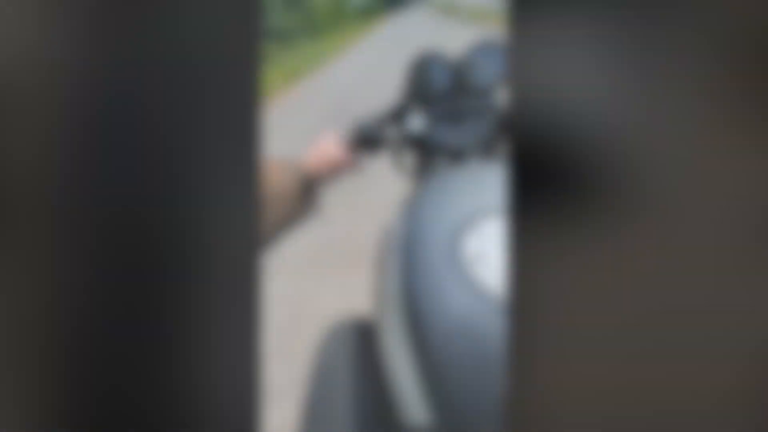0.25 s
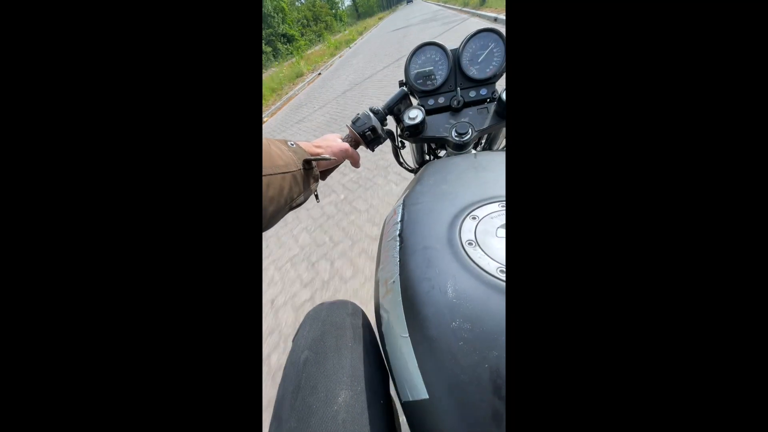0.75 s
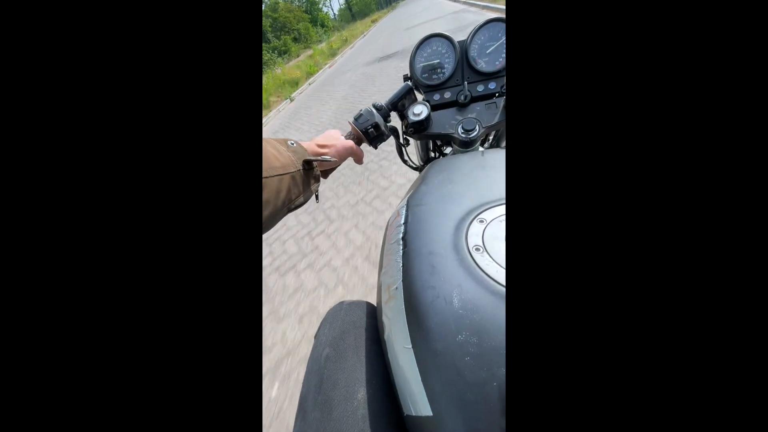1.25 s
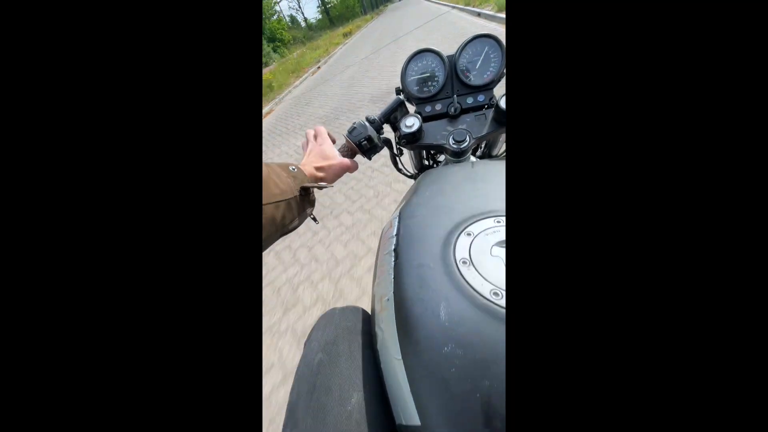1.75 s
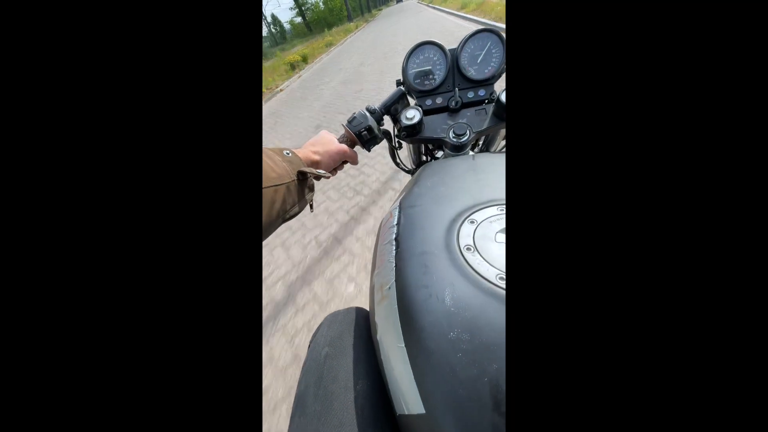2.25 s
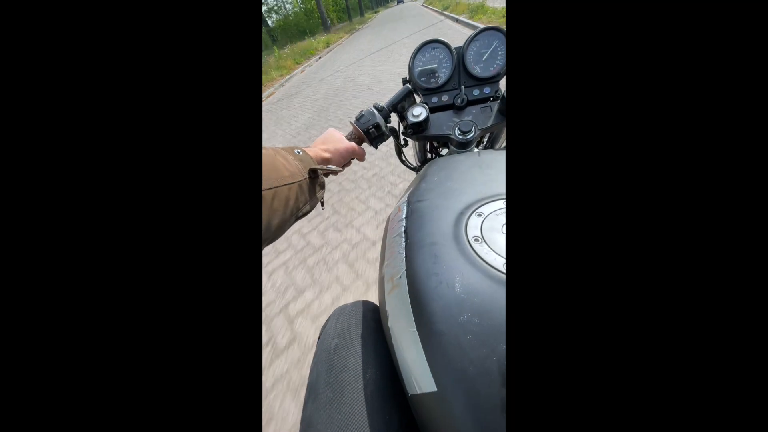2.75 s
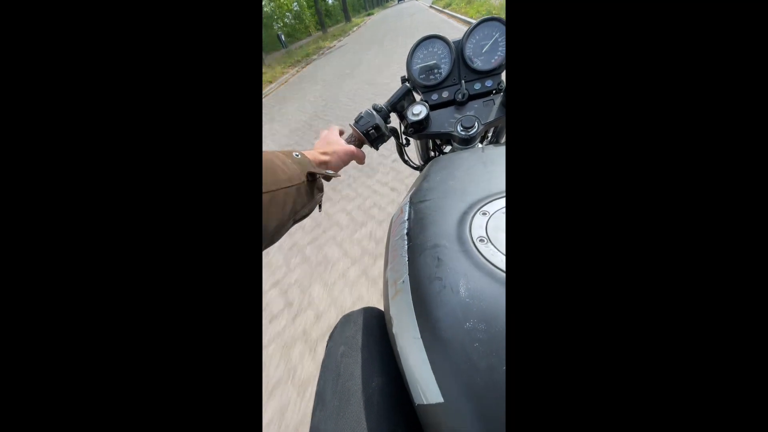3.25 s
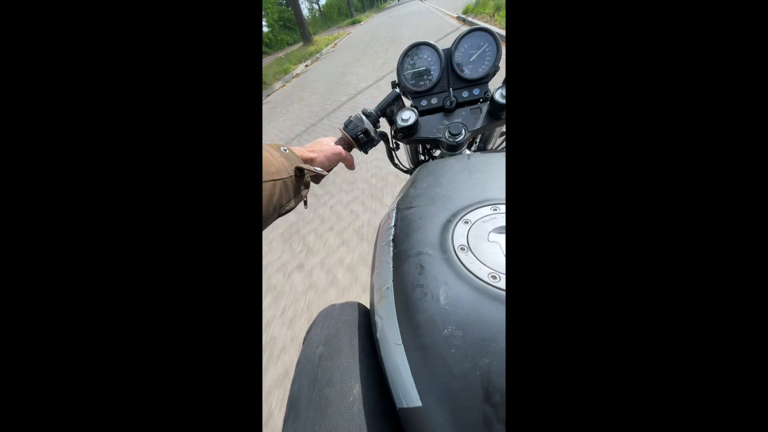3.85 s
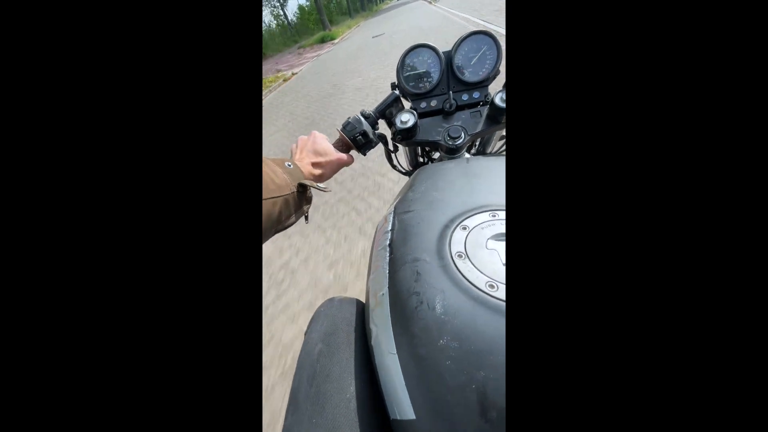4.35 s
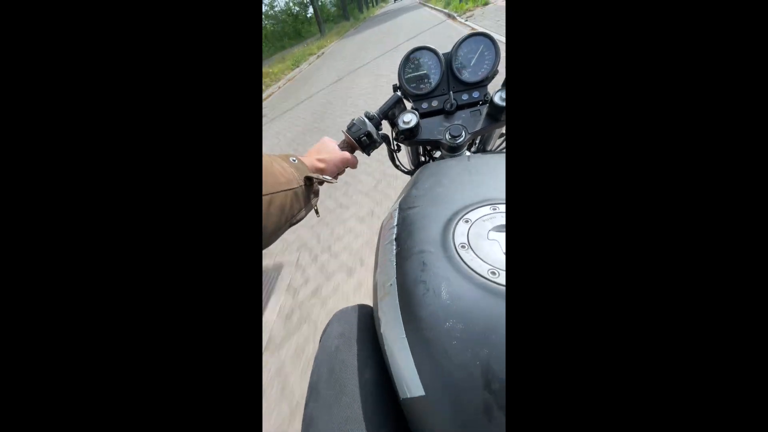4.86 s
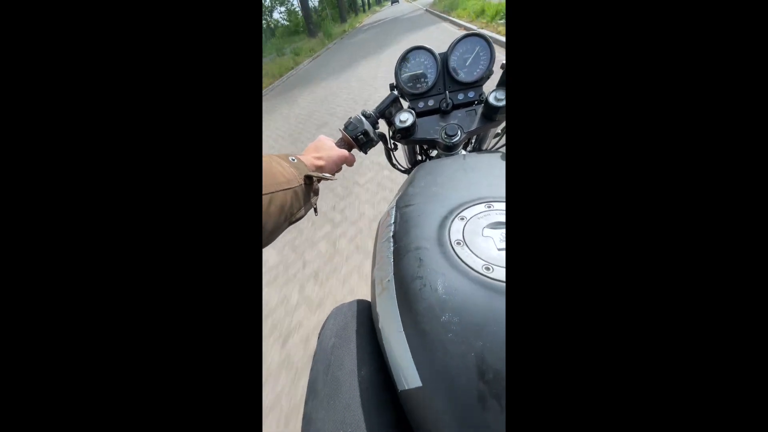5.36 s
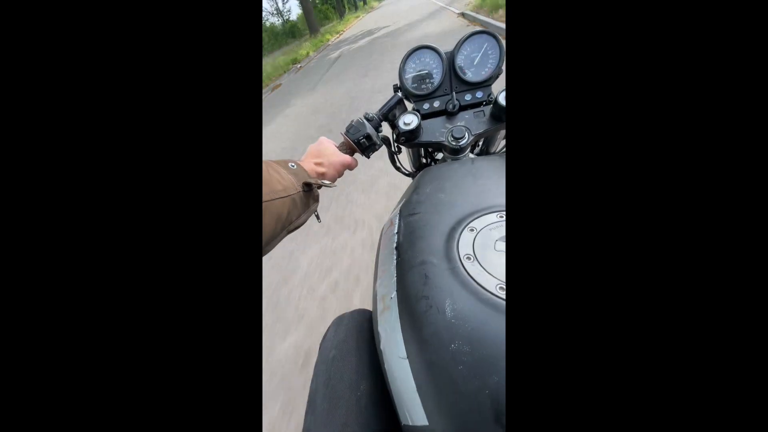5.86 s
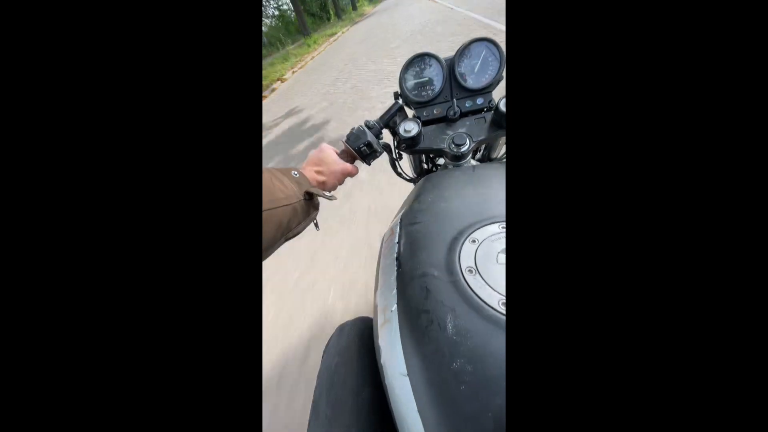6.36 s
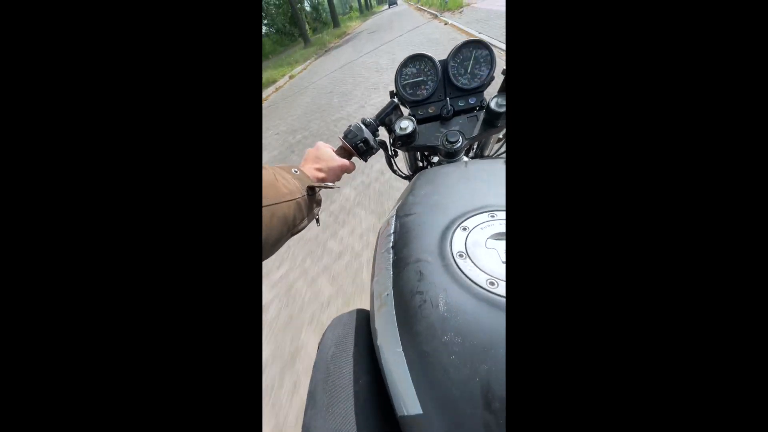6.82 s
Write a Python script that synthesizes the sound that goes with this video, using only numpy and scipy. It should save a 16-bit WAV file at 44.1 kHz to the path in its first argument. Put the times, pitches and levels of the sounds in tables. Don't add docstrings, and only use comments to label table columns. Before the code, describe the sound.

A four-cylinder motorcycle rides on block paving, heard dry and close above the tank, in buffeting wind. At 0 s the clutch bites with a low shudder, bright sizzle and quick metallic ticking. From about 0.4 s a deep intake boom swells, pitch rising steadily from roughly 226 to 274 Hz until 1.2 s, with rasp, hiss, gear whine and rattling. The throttle snaps shut; pitch falls, with knocks, soft thumps and a tiny squeak near 1.7 s. Second gear builds from 1.9 s, strongest near 3.3 s, climbing until 4.05 s. Another shift brings falling pitch, a brief blip at 4.5 s, clutch sizzle and a heavy thump at 4.8 s. A shorter, stuttering third-gear pull ends at 5.4 s with a hard knock. Coasting follows to 7.1 s: pitch sinking below 200 Hz, thin chain hiss, gusts, dull taps and frequent paving knocks.

```python
import sys
import numpy as np
from scipy import signal
from scipy.io import wavfile
from scipy.ndimage import uniform_filter1d, minimum_filter1d

SR = 44100
rng = np.random.default_rng(int(sys.argv[2]) if len(sys.argv) > 2 else 0)


def to_linear_factor(level_db):
    exponent = np.asarray(level_db, float) / 20
    return 10 ** exponent


def dump_mix(stems):
    frames = np.atleast_2d(stems).T
    limited = np.clip(frames, -1, 1)
    pcm = np.round(limited * 32767).astype(np.int16)
    wavfile.write(sys.argv[1], SR, pcm)


N = 312669


def rms_one(x):
    return x / np.sqrt(np.mean(x ** 2) + 1e-20)


def in_time(rows):
    s, *columns = np.transpose(rows)
    return [np.interp(np.arange(N) / SR, s, c) for c in columns]


def bump(s, half_s):
    return np.exp(-((np.arange(N) / SR - s) / half_s) ** 2)


def drift(rate):
    r = np.exp(-80 * np.pi * rate / SR)
    slow = signal.lfilter([1], [1, -2 * r, r * r], rng.standard_normal(N // 40 + 2002))[2000:]
    return np.interp(np.arange(N) / 40, np.arange(len(slow)), rms_one(slow))


def ring(clicks, hz, t60):
    r = to_linear_factor(-60 / (t60 * SR))
    w = 2 * np.pi * hz / SR
    return signal.lfilter([0, np.sin(w)], [1, -2 * r * np.cos(w), r * r], clicks + 1e-18)


def banded_noise(spectrum, gusts_db, own_db):
    hz, level = np.transpose(spectrum)
    edges = hz[0] * 2 ** np.arange(0, np.log2(hz[-1] / hz[0]) + .1, 1 / 3)
    white = rng.standard_normal((2, N))
    out = 0
    for k, (low, high) in enumerate(zip(edges, edges[1:])):
        band_filter = signal.butter(2, [low, high], "band", fs=SR, output="sos")
        band = signal.sosfilt(band_filter, white[k % 2])
        band_db = np.interp(np.log(low * high) / 2, np.log(hz), level)
        out = out + band * to_linear_factor(band_db + own_db * drift(14))
    return rms_one(out * to_linear_factor(gusts_db))


def order(cycles, k, level_db, waver_db):
    spread = .04 * k ** 2 + np.pi * k * (k > 20) + .6 * rng.uniform(-1, 1)
    wobble = .008 * k * drift(8) + .02 * k * drift(.8)
    level = np.sqrt(2) * to_linear_factor(level_db + waver_db * drift(6.1))
    return level * np.sin(2 * np.pi * k * cycles + spread + wobble)


# time in seconds, gain in dB, half length in seconds.
GUSTS = [(0.4, 4.5, 0.023), (0.51, 4, 0.58), (0.8, 2, 0.015), (0.854, 10, 0.0074), (0.973, -4, 0.037),
         (1.175, 8, 0.019), (1.284, -4.3, 0.011), (1.35, 4.7, 0.036), (1.462, -3.5, 0.23),
         (1.45, 0.5, 0.057), (1.565, 5, 0.03), (1.663, -7, 0.015), (1.793, -2, 0.039), (1.985, 5, 0.023),
         (2.17, -9, 0.03), (2.503, 7.5, 0.0078), (2.663, -5, 0.011), (2.855, 3, 0.014), (2.922, 8, 0.46),
         (2.927, -6, 0.032), (3.227, 6, 0.023), (3.337, 4, 0.04), (3.435, 8, 0.025), (3.518, 8.5, 0.015),
         (3.564, 14, 0.018), (3.67, -3, 0.048), (3.842, 4, 0.029), (4.033, -8, 0.037), (4.118, 1, 0.037),
         (4.247, 3.5, 0.038), (4.29, -4.5, 0.2), (4.332, -1, 0.025), (4.64, 2, 0.015), (4.813, 7.5, 0.057),
         (5.107, 8, 0.016), (5.257, 0, 0.04), (5.333, -3, 0.025), (5.403, 5.5, 0.024), (5.496, 2.5, 0.0083),
         (5.65, -4, 0.071), (5.84, 5, 0.026), (5.94, -3, 0.013), (6.206, -2, 0.017), (6.372, -5, 0.011),
         (6.387, 12, 0.015), (6.428, 5, 0.015), (6.465, -4.5, 0.25), (6.563, -2, 0.019), (6.722, -2, 0.015),
         (6.881, -9.5, 0.013), (7.017, -2.5, 0.013)]


def gusts():
    return sum(db * bump(s, half_s) for s, db, half_s in GUSTS)


# frequency in Hz, level in dB per Hz.
THUMP_SPECTRUM = [(30, -27.5), (50, -11.5), (72, 0.5), (110, 1), (180, -3.5), (280, -4.5), (360, -11)]
# frequency in Hz, level in dB per Hz.
FLUTTER_SPECTRUM = [(200, -1.5), (330, 0.5), (500, 4), (800, -4.5), (1200, -9.5), (2000, -24),
                    (3500, -24.5)]


def wind(thump_db, flutter_db):
    eddies = drift(42)
    eddies = rms_one(eddies - uniform_filter1d(eddies, size=1800))
    eddies = 1.6 * np.tanh(eddies / 1.4)
    thump = to_linear_factor(thump_db + 1.5) * banded_noise(THUMP_SPECTRUM, 1.4 * eddies, own_db=1.0)
    flutter = banded_noise(FLUTTER_SPECTRUM, 2.73 * eddies, own_db=3.0)
    burst = rng.random(N) < 120 / SR
    size = to_linear_factor(2.9 * np.minimum(rng.exponential(1, N), 3))
    pops = burst * size * rng.choice([-1, 1], N)
    pops = signal.sosfilt(signal.butter(2, 2500, fs=SR, output="sos"), pops)
    pops = ring(pops, 600, .005) + to_linear_factor(-7) * ring(pops, 1700, .004) + to_linear_factor(-13) * ring(pops, 3200, .003)
    flutter = to_linear_factor(flutter_db - 3.5) * (flutter + to_linear_factor(-11.5) * rms_one(pops))
    low_cut = signal.butter(3, 38, "high", fs=SR, output="sos")
    return signal.sosfilt(low_cut, thump + flutter)


# time in seconds, sharp part in dB, dull part in dB,
# half length in ms.
DEEP_JOINTS = [(0.0717, -36, -38, 3), (0.715, -29, -35, 10), (0.7537, -28, -44, 7.5),
               (0.769, -21.5, -24, 3.9), (0.8524, -27, -18, 0.56), (0.9618, -29.5, -43, 3.5),
               (1.0378, -32.5, -33, 14), (1.3773, -41, -17.5, 4.4), (1.5918, -33.5, -32, 3.8),
               (2.8316, -28.5, -21.5, 0.9), (2.8811, -27, -25, 1.1), (2.9729, -28, -25, 0.61),
               (3.5196, -24.5, -37.5, 1.15), (3.7421, -24, -33.5, 1.1), (3.8483, -27.5, -31.5, 1.3),
               (3.9045, -34, -31, 0.53), (4.4084, -38, -19, 1.1), (4.4953, -41, -20, 4.6),
               (4.6307, -32.5, -33, 5), (4.7448, -30.5, -17, 2.3), (4.789, -30.5, -32, 0.92),
               (4.8412, -32.5, -39.5, 7.5), (5.4928, -32, -21, 3), (5.7291, -29, -12.5, 2.5),
               (5.8215, -36, -13, 1.2), (5.9104, -33.5, -13, 0.86), (5.9514, -45, -17, 0.45),
               (6.1331, -41, -17, 0.73), (6.3877, -53, -30, 2.2), (6.8136, -62, -21, 4)]
# time in seconds, peak in dB, sharp part in dB against the peak.
SHALLOW_JOINTS = [(0.8, -20.5, -14), (0.838, -21.5, -11), (1.206, -23, -15), (1.427, -34, 3),
                  (1.879, -25.5, -14), (4.019, -27.5, -19), (4.071, -26.5, -7.5), (4.373, -41, -16),
                  (4.452, -32, -16), (4.826, -20.5, -14), (4.878, -23, -10), (4.963, -25, -17),
                  (5.011, -19, -5.5), (5.69, -31, -6), (5.788, -33, -11), (5.859, -30, -22),
                  (5.97, -31, -2), (6.026, -19, -17), (6.098, -36, -17), (6.165, -24, -6),
                  (6.254, -19.5, -32.5), (6.293, -25, -13), (6.434, -15.5, -26), (6.479, -37, -17),
                  (6.508, -25, -20), (6.59, -27, -20), (6.647, -29, -22), (6.676, -31, -23),
                  (6.79, -41, -22), (6.837, -22, -21), (6.892, -45, -16), (6.906, -24, -20),
                  (6.969, -19, -21), (7.042, -33, -23)]
# time in seconds, peak in dB, sharp part in dB against the peak.
DRIVE_KNOCKS = [(0.687, -27, -10), (0.729, -14, -22), (0.883, -26, -5), (0.929, -25, -11),
                (1.014, -25, -13), (1.088, -24.5, -13), (1.187, -21, -19.5), (1.254, -22.5, -16),
                (1.399, -21, -23), (1.465, -28, -7.5), (1.524, -40, -18), (1.571, -24, -13),
                (1.61, -29, -6), (1.723, -28, -7), (1.847, -24.5, -8.5), (4.107, -23.5, -16),
                (4.122, -22.5, -15), (4.177, -28, -10), (4.226, -29.5, -10), (4.282, -31, -10),
                (4.344, -44, -19), (4.467, -28, -19), (4.515, -19.5, -23), (4.547, -19, -23),
                (5.283, -9.5, -32), (5.409, -22, -19), (5.443, -35, -20), (5.543, -26, -18)]


def joints():
    shallow = [(s + .002, db + sharp_db - 8, db + 3, 2.2) for s, db, sharp_db in SHALLOW_JOINTS]
    knocks = [(s, db + sharp_db, db + 1.5, 1.84) for s, db, sharp_db in DRIVE_KNOCKS]
    return DEEP_JOINTS + shallow + knocks


# time in seconds, level in dB, half length in seconds.
RATTLES = [(0.697, -31, .02), (.745, -33, 0.05), (0.84, -31.5, 0.012), (0.893, -38, 0.013),
           (0.93, -35.5, 0.025), (0.965, -32.5, 0.0086), (1.049, -34.5, 0.035), (1.094, -38, 0.0088),
           (1.385, -39.5, 0.023), (2.84, -40, 0.011), (3.57, -43, 0.016), (3.867, -40, 0.026),
           (4.11, -44, 0.026), (5.416, -44.5, 0.0095), (5.86, -53, 0.01), (5.96, -42.5, 0.013),
           (6.226, -44, 0.023), (6.39, -48, 0.011), (6.426, -45, 0.014), (6.808, -43, 0.013),
           (6.844, -54, 0.0065), (6.915, -51, 0.012), (6.967, -49, 0.0063), (7.052, -46, 0.0093)]
# frequency in Hz, level in dB, 60 dB decay in seconds.
FRAME_MODES = [(507, 1.5, 0.0084), (1310, 7.5, 0.0034), (1630, 2.5, 0.0044), (2230, 0, .004),
               (3230, -5.5, 0.0031), (4400, -13.5, 0.0022), (6500, -17.5, 0.0028), (9000, -21, .002)]


def jolts():
    rattles_per_s = 900
    thud_hz, thud_db, thud_t60_s, thud_late_s = 190, -32, 0.025, 0.0036
    lag_ms = np.arange(-400, 400) * 1000 / SR
    rows = joints()
    ragged = rng.standard_normal((len(rows), 2, len(lag_ms)))
    shakes = np.zeros((2, N))
    for (s, sharp_db, dull_db, half_ms), noise in zip(rows, ragged):
        shape = np.exp(-(lag_ms / half_ms) ** 2)
        energy = np.sum((noise * shape) ** 2, axis=1, keepdims=True)
        knock = noise * shape * np.sqrt(np.sum(shape ** 2) / energy)
        level = to_linear_factor(np.array([[sharp_db], [dull_db]])) / np.sqrt(np.clip(half_ms, .3, 2))
        at = round(s * SR) - 420
        shakes[:, at:at + len(lag_ms)] += knock * level
    grains = (rng.random(N) < rattles_per_s / SR) * rng.standard_normal(N)
    shakes[0] += grains * sum(to_linear_factor(db + 13.5) * bump(s, half_s) for s, db, half_s in RATTLES)
    (dull_hz, dull_db, dull_t60), *modes = FRAME_MODES
    sharp = sum(to_linear_factor(db - 18) * ring(shakes[0], hz, t60) for hz, db, t60 in modes)
    sharp = signal.sosfilt(signal.butter(2, 6000, fs=SR, output="sos"), sharp)
    dull = to_linear_factor(dull_db - 20.5) * ring(shakes[1], dull_hz, dull_t60)
    late = np.roll(shakes[1], int(thud_late_s * SR))
    return sharp + dull + to_linear_factor(thud_db) * ring(late, thud_hz, thud_t60_s)


# time in seconds, peak in dB.
SNAPS = [(1.591, -43), (2.972, -45), (3.5174, -47), (3.7412, -45), (3.8512, -44.5), (4.786, -48),
         (4.8406, -54), (5.4926, -39), (5.728, -54), (5.82, -48), (5.908, -46)]
# time in seconds, peak in dB.
TAPS = [(1.524, -34), (4.345, -34), (4.399, -42), (4.467, -30), (4.492, -30.5), (4.629, -28), (5.442, -29),
        (6.506, -32.5), (6.59, -34), (6.791, -31), (7.044, -29)]
TAP_HZ = (620, 1150, 1900)


def snaps():
    snap_half_s, tap_t60_s = .0006, .022
    crack = rng.standard_normal(N) * sum(to_linear_factor(db - .5) * bump(s + .001, snap_half_s) for s, db in SNAPS)
    band = signal.butter(1, [2800, 9500], "band", fs=SR, output="sos")
    clicks = np.zeros(N)
    for s, db in TAPS:
        clicks[int(s * SR)] = to_linear_factor(db - 3.5)
    taps = sum(800 / hz * ring(clicks, hz, tap_t60_s * 800 / hz) for hz in TAP_HZ)
    return 2 * signal.sosfilt(band, crack) + taps


# start in seconds, end in seconds, ticks per second, level in dB,
# fading in dB per second, high modes in dB.
CHATTER = [(.002, .095, 71.5, -39, 10, 3), (.098, .14, 71.5, -50, 0, -2), (.15, .19, 73, -41, 120, 3),
           (.192, .3, 71.5, -48, 40, -2), (.326, .345, 140, -50, 0, 0), (1.505, 1.56, 190, -56, 0, -12),
           (4.365, 4.4, 215, -62, 0, -12), (6.59, 6.685, 200, -59, 0, -9), (6.705, 6.75, 200, -59, 0, -9)]


def chatter():
    low, high = np.zeros(N), np.zeros(N)
    for start, end, per_s, level_db, fading_db, high_db in CHATTER:
        s = np.arange(start + .004, end, 1 / per_s)
        late, size = np.clip(rng.standard_normal((2, 99))[:, :len(s)], -1.5, 1.5)
        at = ((s + 0.017 * late / per_s) * SR).astype(int)
        low[at] = to_linear_factor(level_db - fading_db * (s - start) + 2.0 * size)
        high[at] = low[at] * to_linear_factor(high_db)
    ticks = sum(ring(low, hz, 0.0057) for hz in (7600, 8500, 9500))
    ticks += sum(ring(high, hz, .003) for hz in (12500, 13700, 11000, 15000))
    return signal.sosfilt(signal.butter(4, 6500, "high", fs=SR, output="sos"), ticks)


def squeak():
    at_s, half_s, hz, hz_per_s = 1.68, .02, 5050, -8000
    t = np.arange(N) / SR - at_s
    return to_linear_factor(-58) * bump(at_s, half_s) * np.sin(2 * np.pi * (hz + hz_per_s * t / 2) * t)


def launch_rumble():
    shudder = rms_one(ring(rng.standard_normal(N), 75.5, 0.33))
    return to_linear_factor(-29) * bump(0.066, 0.23) * shudder


# time in seconds, peak in dB,
# frequency in Hz.
LURCHES = [(1.538, -31, 190), (1.56, -22.5, 158), (1.662, -31, 211), (4.598, -20, 201), (1.708, -22, 180),
           (1.845, -20, 222), (4.229, -25.5, 204), (4.432, -21, 170), (4.785, -10, 235),
           (5.448, -15.5, 152), (5.497, -18, 140), (5.824, -33, 169), (6.655, -22, 190),
           (6.685, -23.5, 200), (7.047, -18, 180)]


def lurches():
    t60_s = 0.055
    t = np.arange(N) / SR
    out = 0
    for s, db, hz in LURCHES:
        level = to_linear_factor(db - 60 * np.maximum(t - s, 0) / t60_s) * (t > s)
        out = out + level * np.sin(2 * np.pi * hz * (t - s))
    return out


def coast_casing_ring():
    hz, width_hz, level_db = 2680, 450, -57.5
    hiss = rms_one(ring(rng.standard_normal(N), hz, 1.8 / width_hz))
    fade_in = np.clip(np.arange(N) / SR * 10 - 53, 0, 1)
    return to_linear_factor(level_db + 1.5 * drift(12)) * (.45 + bump(5.75, .35)) * fade_in * hiss


# time in seconds, sizzle gained in dB, half length in seconds.
SPITS = [(.01, 1, .012), (0.082, 7, 0.026), (0.121, 3.5, 0.0037), (0.334, 1.5, .01), (4.3, -2.5, 0.081),
         (4.531, 9, 0.047), (4.696, 5, 0.09), (0.414, 4.5, 0.086)]


def clutch_spits():
    return sum(db * bump(s, half_s) for s, db, half_s in SPITS)


# frequency in Hz, level in dB per Hz.
HISS_SPECTRUM = [(700, -5), (1100, 1), (1600, -4), (2100, -16), (3000, -11.5), (4000, -9.5), (5300, -20.5),
                 (7000, -18), (9500, -29.5)]
# frequency in Hz, level in dB per Hz.
SIZZLE_SPECTRUM = [(5500, 7), (7500, 0), (9500, -7), (11000, 7), (13000, -14), (15000, -7.5), (17500, 1.5)]
# frequency in Hz, width in Hz, level in dB against the hiss.
CASING = [(2750, 240, -8), (2460, 170, -16), (3000, 160, -13), (4520, 200, -20.5), (4850, 220, -13.5),
          (5200, 220, -22), (7000, 80, -24), (9300, 200, -26), (11600, 60, -37), (12220, 60, -37.5)]
# order of the full cycle, level in dB against the hiss,
# gain in first gear in dB.
WHINE = [(33, -18, 0), (34, -19, 2), (38, -26, 6), (41, -24, 3), (44, -19, -2), (46.7, -23, 8),
         (50, -22, 10), (52, -16, -10), (54, -20, -8), (62.3, -28, 11), (67.2, -22, -6), (73.2, -19, -10),
         (72, -34, 11), (82.2, -27, 2), (84, -25, -3), (90, -19, -4), (93.5, -34, 10), (109, -38, 11),
         (147, -37, 0)]


def machinery(firing_hz, cycles, hiss_db, sizzle_db, whine_db):
    puff_db = 1.6 * np.cos(8 * np.pi * cycles) + 1.2 * np.cos(2 * np.pi * cycles) + .8 * drift(25)
    hiss = to_linear_factor(1.5) * banded_noise(HISS_SPECTRUM, puff_db, own_db=-0.5)
    taps = rng.standard_normal(N) * to_linear_factor(puff_db)
    for hz, width, db in CASING:
        hiss += to_linear_factor(db + 1.6 * drift(2.5)) * rms_one(ring(taps, hz, 2.2 / width))
    low_gear = np.exp(-(np.arange(N) / SR / 1.2) ** 6)
    cover_hz, cover_width_hz, cover_loss_db = 5420, 220, -12
    for k, db, low_db in WHINE:
        detune = (k * firing_hz / 4 - cover_hz) / cover_width_hz
        off = (80 < k < 100) * (1 - np.exp(-detune ** 4))
        level_db = db + 1.5 + cover_loss_db * off + whine_db + low_db * low_gear + 1.5 * drift(2.2)
        hiss += order(cycles, k, level_db, 2.5)
    sizzle = banded_noise(SIZZLE_SPECTRUM, .6 * puff_db, own_db=.5)
    return to_linear_factor(hiss_db) * hiss + to_linear_factor(sizzle_db - .6) * sizzle


# time in seconds, firings per second.
SPEED = [(0.0, 226.0), (0.3, 236.8), (1.205, 274.5), (1.33, 253.1), (1.5, 230.5), (1.62, 221.2),
         (1.95, 221.0), (2.5, 238.0), (4.045, 271.4), (4.22, 244.3), (4.45, 229.8), (4.51, 254.2),
         (4.6, 229.5), (4.8, 229.5), (5.37, 241.3), (5.6, 231.0), (6.6, 200.6), (7.09, 193.4)]
# time in seconds,
# firings per second gained, half length in seconds.
HUNTING = [(.15, 1.8, .05), (.95, .7, .2), (2.6, -1.5, .035), (2.67, 1, .03), (3.0, .7, .15),
           (3.16, 1.2, .035), (3.51, 1.2, .03), (3.58, -1.2, .03), (3.65, 1.4, .03), (3.75, -2, .06),
           (5.0, 1, .07), (5.24, -1.4, .05)]


def engine_speed():
    return in_time(SPEED)[0] + sum(gain * bump(s, half_s) for s, gain, half_s in HUNTING)


# time in seconds, intake boom in dB,
# strain in dB.
PULLS = [
    [(0.0, -30.5, -46), (0.05, -23, -43), (0.2, -21.5, -39), (0.38, -16, -37.5), (0.46, -13.5, -34),
     (0.65, -13, -38), (0.8, -8.5, -37.5), (0.92, -13, -50), (1.205, -10, -45.5)],
    [(1.62, -53, -48.5), (1.7, -50, -52.5), (1.8, -35, -46.5), (1.95, -19.5, -39), (2.2, -12.5, -39),
     (2.45, -12.5, -39.5), (2.7, -10.5, -40), (3.3, -6, -38), (3.75, -13, -49.5), (4.045, -14, -51)],
    [(4.57, -45, -52), (4.66, -36, -51), (4.72, -28, -43.5), (4.8, -22.5, -54.5), (4.95, -20, -46),
     (5.1, -19.5, -45.5), (5.25, -20, -48), (5.37, -15.5, -45.5)],
    [(5.5, -48, -84), (5.6, -43.5, -62), (6.3, -40, -56), (6.8, -45.5, -65), (7.2, -36, -60)],
]
# time in seconds, boom in dB, half length in seconds.
AFTERFIRE = [(1.279, -26, 0.021), (1.332, -28, 0.011), (1.372, -37.5, 0.011), (4.22, -41, 0.036),
             (4.512, -29, 0.024)]


def throttle():
    boom = np.full(N, to_linear_factor(-65.5))
    strain = np.full(N, to_linear_factor(-69))
    for pull in PULLS:
        start = pull[0][0]
        shut, boom_db, strain_db = pull[-1]
        snap = (shut + .036, boom_db - 22, strain_db - 7)
        down = (snap[0] + 1, snap[1] - 120, snap[2] - 48)
        b, s = in_time([(start - .1, -90, -90)] + pull + [snap, down])
        boom, strain = boom + to_linear_factor(b), strain + to_linear_factor(s)
    boom = boom + sum(to_linear_factor(db) * bump(s, half_s) for s, db, half_s in AFTERFIRE)
    return 20 * np.log10(boom), 20 * np.log10(strain)


# frequency in Hz, width in Hz, lift in dB,
# level in dB at a strain of -38 dB, dB per dB of strain.
FIFTH_DUCT = (285, 29.5, 16.5, -40, 1.5)
EIGHTH_DUCT = (468, 55, 13, -44, .7)


def ringing_order(k, firing_hz, strain_db, hz, width, lift_db, level_db, follows):
    detune = 2 * (k * firing_hz / 4 - hz) / width
    return level_db + follows * (strain_db + 38) + lift_db / (1 + detune ** 2)


# order of the full cycle, level in dB against the rasp.
UNEVEN_ORDERS = [(1, -9), (2, -7), (3, -7), (6, -14), (7, -18), (9, -12), (10, -19), (11, -20), (12, -11),
                 (13, -11), (14, -26), (15, -17), (16, -10), (17, -12), (18, -15), (19, -17), (20, -13),
                 (21, -23), (22, -14), (23, -17), (24, -13), (25, -22), (26, -22), (27, -27), (28, -17),
                 (29, -27), (30, -24), (31, -28), (32, -20)]
# frequency in Hz, width in Hz, lift in dB.
PIPES = [(350, 30, 4), (1085, 110, 12), (1185, 60, -9), (1400, 200, 6), (1260, 70, 5), (750, 150, 3),
         (975, 90, 4), (1620, 170, 7)]
# time in seconds, depth in dB.
STUMBLES = [(.129, 1.5), (.268, 2), (.354, 17), (0.402, 8), (0.503, 0), (2.109, 12), (2.217, 11),
            (2.297, 5), (2.557, 6), (2.624, 4.5), (2.97, 5.5), (3.107, 6), (3.198, 4.5), (3.404, 3.5),
            (3.571, 5), (3.72, 5), (3.858, 8), (4.802, 19), (5.005, 12), (5.137, 21), (5.151, 18),
            (5.165, 11), (5.22, 7.5), (5.261, 8)]
LUGGING = {12: 3, 17: -10, 18: -4, 19: 5.5, 20: -6, 13: -5, 25: -6, 22: 1, 23: -5, 24: -6, 28: 1, 29: 5}
SLIPPING = {3: -4, 10: -4, 12: -9, 13: -3, 14: -4, 15: -5, 17: -3, 18: -4, 22: -3}
GRIPPING = {13: -4, 15: -4, 22: 3, 23: -2, 24: -8, 25: 3, 26: -2, 32: 2}


def engine(firing_hz, cycles, boom_db, fifth_db, eighth_db, rasp_db):
    t = np.arange(N) / SR
    dent_db = sum(depth * np.exp(-((t - s) / 0.0044) ** 2) for s, depth in STUMBLES)
    out = order(cycles, 4, boom_db + 1.1 - dent_db, 0.6)
    out += order(cycles, 5, fifth_db, 2.0)
    out += order(cycles, 8, eighth_db, .8)
    lugging = np.clip((238 - firing_hz) / 10, 0, 1)
    slip = np.clip((.37 - t) / .03, 0, 1)
    grip = (1 - slip) * (t < 1.5)
    bite_db = 23 * bump(0, .075)
    for k, order_db in UNEVEN_ORDERS:
        lift_db = 0
        for hz, width, db in PIPES:
            lift_db = lift_db + db / (1 + ((k * firing_hz / 4 - hz) / (width / 2)) ** 2)
        gear_db = slip * SLIPPING.get(k, 0) + grip * GRIPPING.get(k, 0) + (k in (6, 7)) * bite_db
        level_db = rasp_db + order_db + lift_db + lugging * LUGGING.get(k, 0) + gear_db + 2.5
        out += order(cycles, round(k), level_db, 1.3)
    return out


def scene():
    t = np.arange(N) / SR
    firing_hz = engine_speed()
    cycles = np.cumsum(firing_hz / 4) / SR + .0011 * drift(30)
    boom_db, strain_db = throttle()

    rasp_db = strain_db + 1.3 * np.minimum(strain_db + 49, 0)
    first_gear_s = .8
    fifth_db = ringing_order(5, firing_hz, rasp_db, *FIFTH_DUCT) + 4 * bump(.6, .25)
    eighth_db = ringing_order(8, firing_hz, rasp_db, *EIGHTH_DUCT)
    eighth_db += 7 * bump(.72 * first_gear_s, .55 * first_gear_s) + 9 * bump(1.74, 0.075)

    hiss_lag_s, build_s = 0.05, 0.22
    effort_db = uniform_filter1d(strain_db + 38, size=int(hiss_lag_s * SR), mode="nearest")
    keep = np.exp(-1 / (build_s * SR))
    effort_db = np.minimum(effort_db, signal.lfilter([1 - keep], [1, -keep], effort_db))

    launch = np.exp(-t / 0.16)
    spit_db = clutch_spits()
    racing_hz = np.maximum(firing_hz - 240, 0)
    hiss_db = -44 + 0.69 * effort_db + 0.0682 * racing_hz + .6 * spit_db
    sizzle_db = -57 + 0.51 * effort_db + 11 * launch + spit_db - 0.25 * racing_hz
    whine_db = -.3 * np.maximum(firing_hz - 243, 0) + 3 * bump(0, first_gear_s)

    gust_db = gusts()
    thump_db = -35 + gust_db + 11 * bump(0, 0.1)
    flutter_db = -32 - 4 * launch + 0.96 * gust_db - 0.35 * t
    mix = wind(thump_db, flutter_db)
    mix += jolts() + snaps() + chatter()
    mix += squeak() + launch_rumble() + lurches() + coast_casing_ring()
    mix += machinery(firing_hz, cycles, hiss_db, sizzle_db, whine_db)
    mix += engine(firing_hz, cycles, boom_db, fifth_db, eighth_db, rasp_db)
    return mix[None]


def low_pass(x):
    return signal.sosfilt(signal.butter(12, 15730, fs=SR, output="sos"), x)


def record(dry):
    over_db = np.maximum(20 * np.log10(abs(dry) + 1e-9) + 7.66, 0)
    fall = 100.0 * np.arange(N) / SR
    held_db = np.maximum.accumulate(over_db + fall, axis=1) - fall
    held_db = uniform_filter1d(-minimum_filter1d(-held_db, size=81), size=81)
    dry = signal.sosfilt(signal.butter(2, 34, "high", fs=SR, output="sos"), dry)
    dry = signal.sosfilt(signal.cheby2(12, 60, 16500, fs=SR, output="sos"), dry)
    return low_pass(dry * to_linear_factor(-held_db))


dry = scene()
out = record(dry)
dump_mix(out)
```